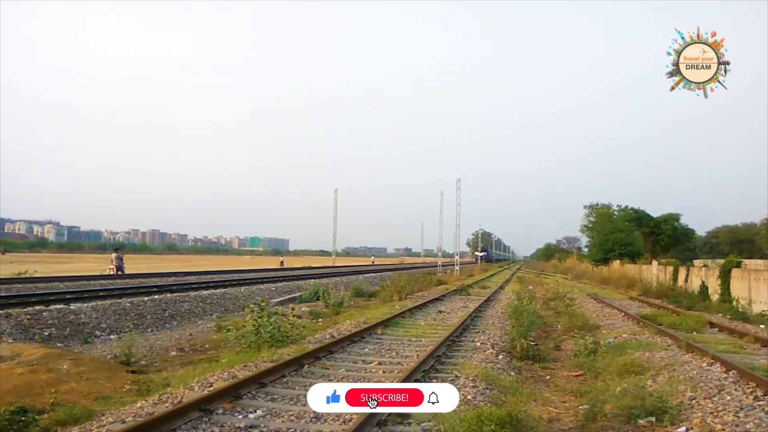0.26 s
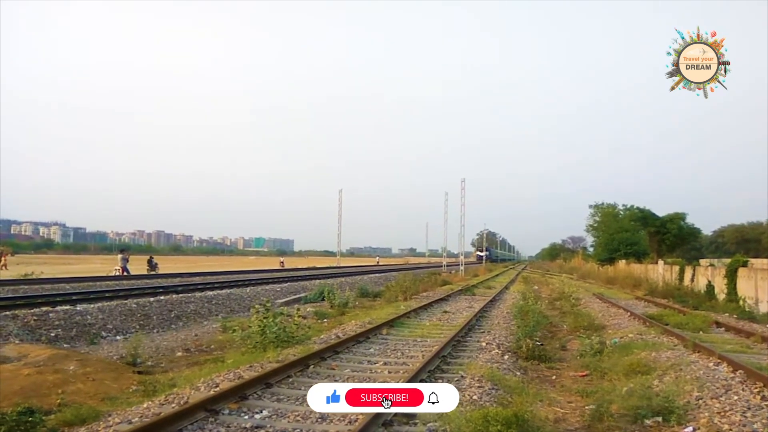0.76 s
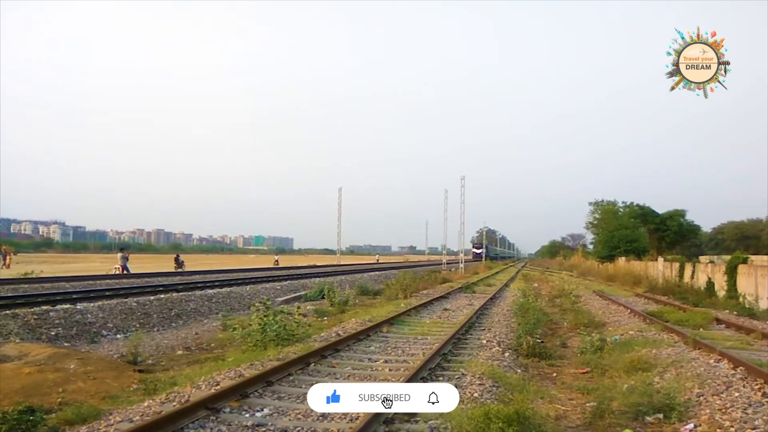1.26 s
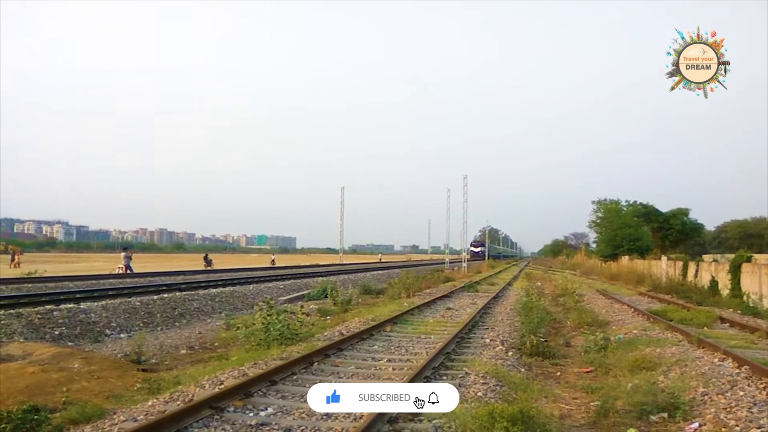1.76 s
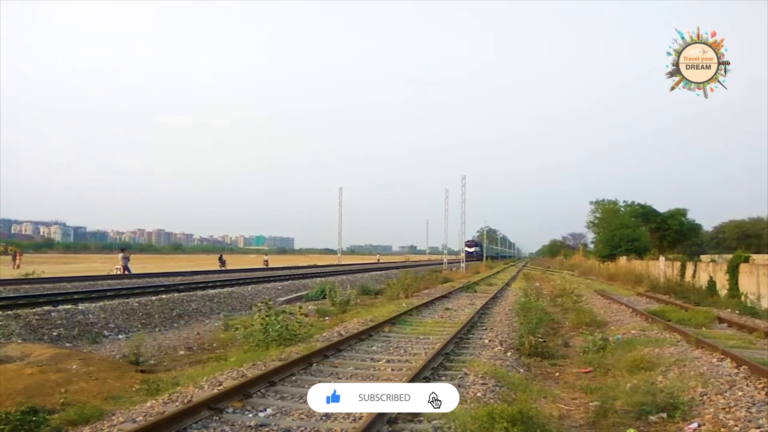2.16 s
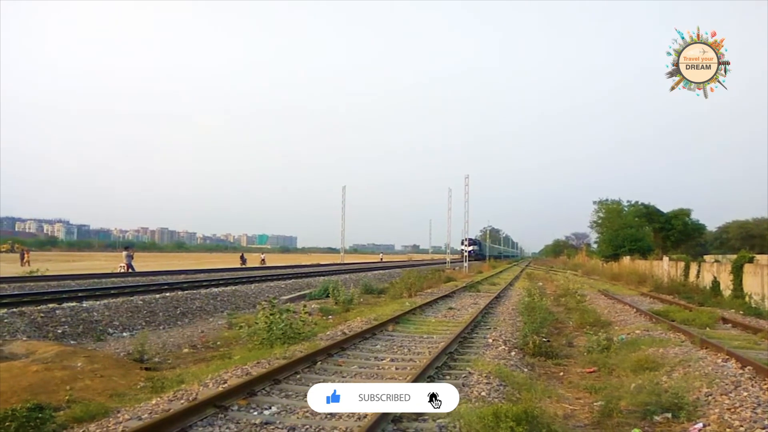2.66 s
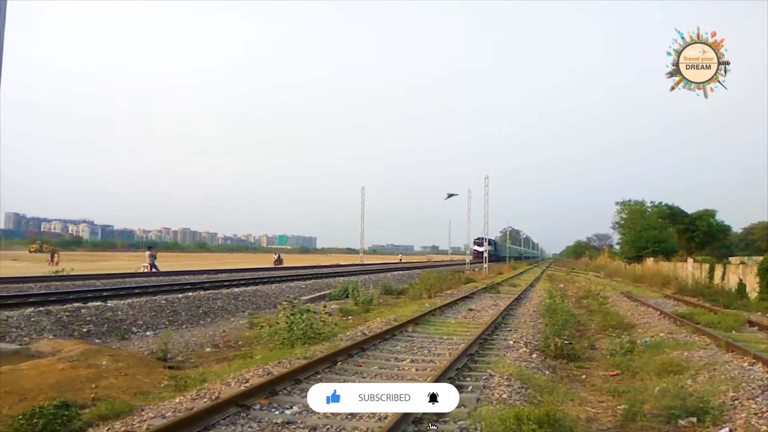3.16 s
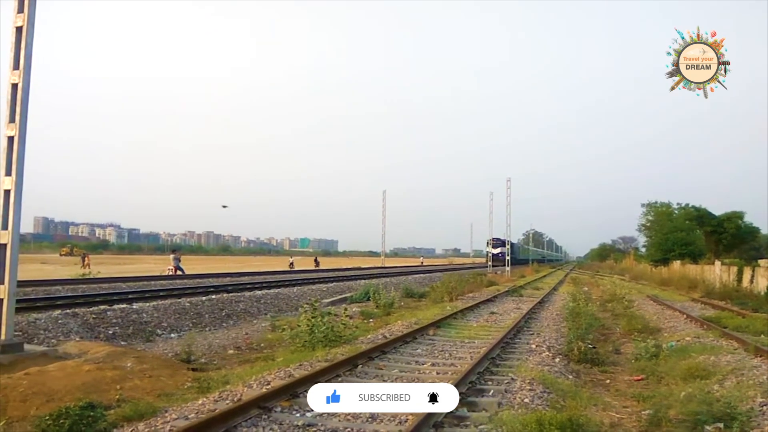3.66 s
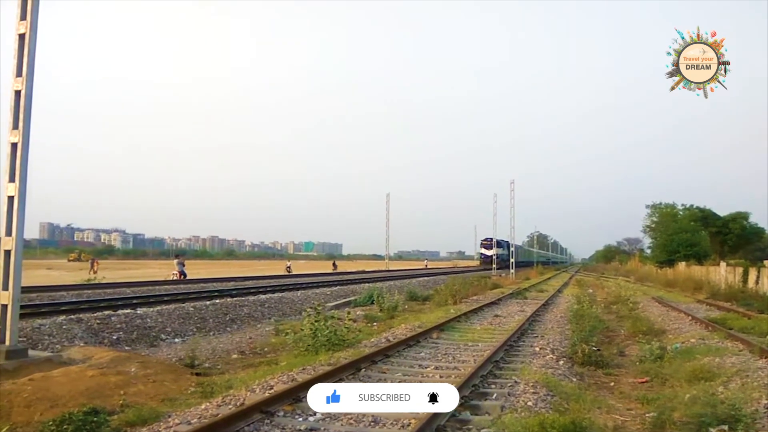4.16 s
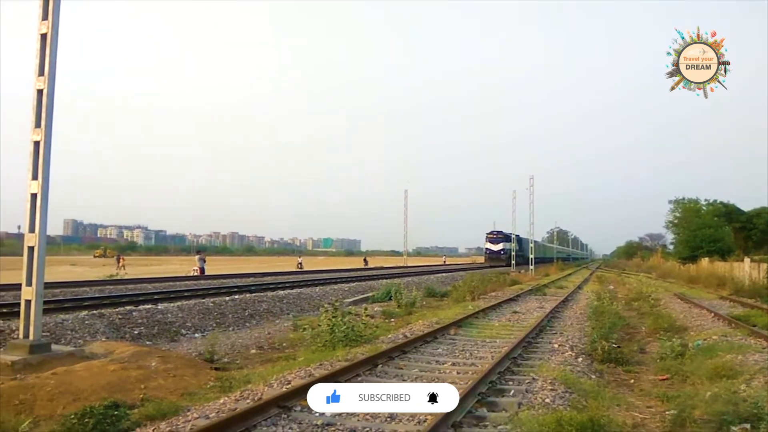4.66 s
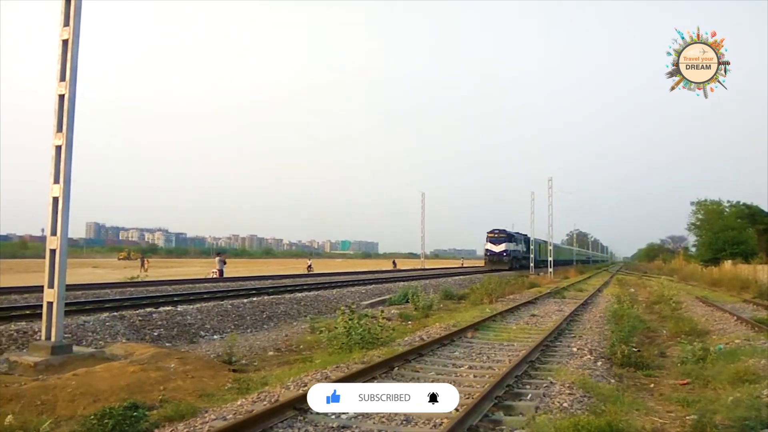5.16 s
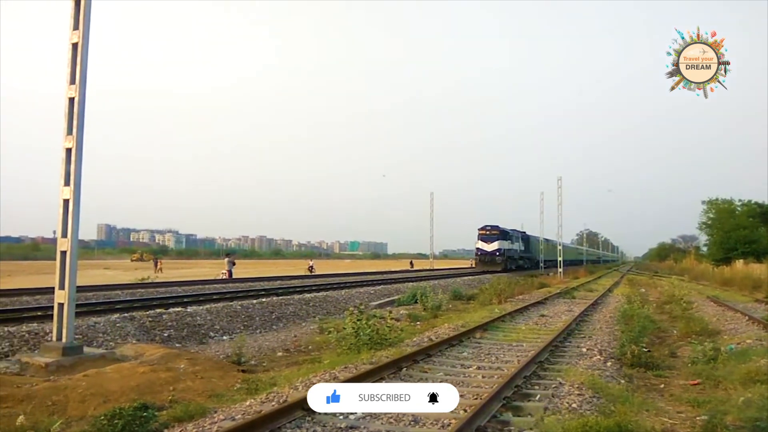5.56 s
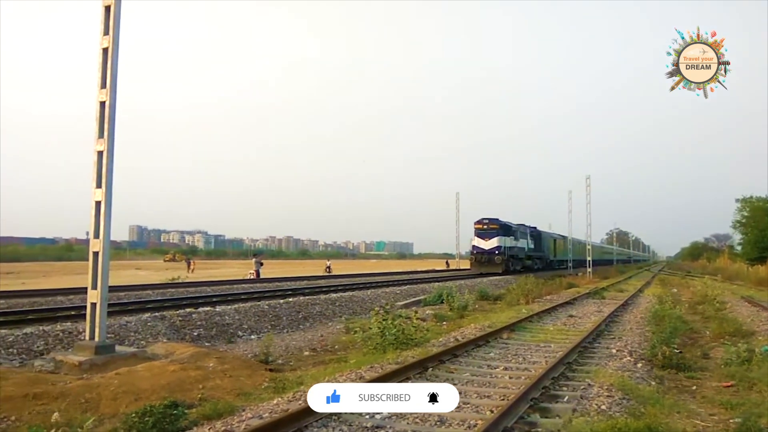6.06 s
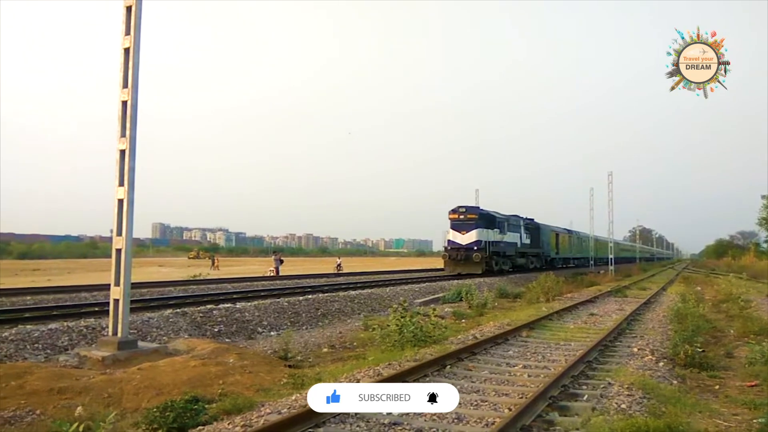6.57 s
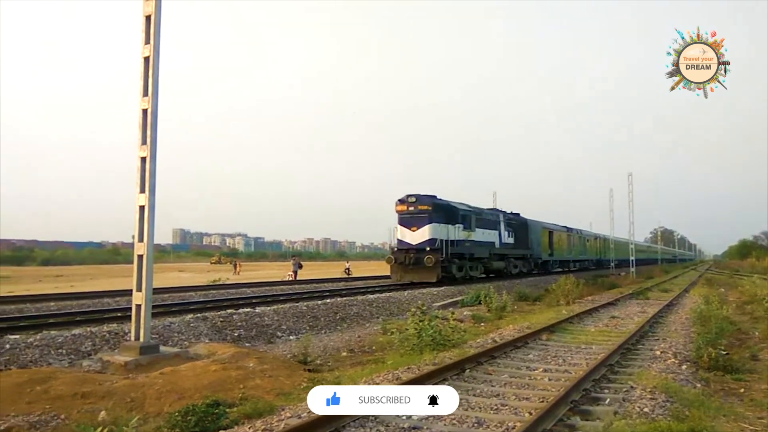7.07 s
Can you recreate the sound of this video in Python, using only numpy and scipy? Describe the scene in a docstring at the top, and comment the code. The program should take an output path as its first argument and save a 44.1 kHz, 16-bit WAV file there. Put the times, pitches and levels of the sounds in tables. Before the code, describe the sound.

Open fields by a railway, heard through a phone in stereo. From 0 to 4.5 s it is quiet: soft airy field noise, low rumble and a wavering diesel drone around 80 Hz that dips and surges. Small birds give short raspy falling chirps, clearest around 0.2-1.3 s, with more near 1.8-3.5 s. A faint, distant steady tone near 355 Hz swells from about 1.1 to 2.4 s. At 4.55 s a loud air horn bursts in near 456 Hz, joined at 4.77 s by a lower one near 322 Hz: a harsh, brassy tritone with shimmer, rushing air and blurred field echoes. Its colour shifts as the train nears. Both stop sharply around 6.6 s, leaving a short echo. Rumble and engine swell; from 6.9 s quick metallic rail knocks and rattling build, and from 7.1 s a bright hiss of escaping air rises with the wheel roar until the end at 7.3 s.

```python
"""Open fields beside a railway track: a diesel locomotive approaches a phone.
Two air horns a tritone apart, summed from overtones, sound over a wavering exhaust drone;
escaping air, rumble, wheel roar and hiss are shaped noise, and wheel blows ring rail modes.
Small birds are chopped falling chirps; a faint far tone swells before the horns."""
import sys
import numpy as np
from scipy import signal
from scipy.fft import rfft, irfft, next_fast_len
from scipy.io import wavfile
from scipy.ndimage import uniform_filter1d

SR = 44100
rng = np.random.default_rng(int(sys.argv[2]) if len(sys.argv) > 2 else 0)


def decibels_to_gain(level_db):
    """Convert a level in decibels to a linear amplitude gain (20 dB per decade)."""
    exponent = np.asarray(level_db, float) / 20
    return 10 ** exponent


def transcribe(u):
    """Save the signal u as a 16-bit wav file named by the first command-line argument.

    u: samples, shape (n,) or (channels, n), limited to [-1, 1]; the rate is SR.
    q: integer samples, one column per channel.
    """
    v = np.clip(np.atleast_2d(u).T, -1, 1)
    q = np.round(v * 32767).astype(np.int16)
    wavfile.write(sys.argv[1], SR, q)


N = 321930
t = np.arange(N) / SR

# horn valves: full_s, shut_s, pitch_hz, sag_hz_per_s, rise_db_per_s, fall_db_per_s2
# (rise and fall grow with overtone number)
HIGH_HORN_VALVE = (4.553, 6.595, 455.9, 1.0, 1400, 5000)
LOW_HORN_VALVE = (4.77, 6.6, 321.9, .7, 300, 2880)
# horn overtones: multiple, far_rms_db, change_when_near_db
HIGH_HORN_TONES = [(1, -23, -7), (2, -20.5, -6.5), (3, -32.5, 5.5), (4, -39.5, -4), (5, -36.5, 4.5),
                   (6, -35.5, 0), (7, -44.5, -2.5), (8, -39, 2), (9, -47, 2), (10, -42, -5), (11, -52, 1.5),
                   (12, -48, -3.5), (13, -52, -6.5), (14, -57.5, -7), (15, -67.5, -4.5), (16, -80, -5.5),
                   (19, -91.5, 4.5), (20, -87.5, -5.5)]
LOW_HORN_TONES = [(1, -22.5, 6.5), (2, -26.5, -4.5), (3, -26.5, -4.5), (4, -40, 5), (5, -46.5, 2),
                  (6, -46.5, 2), (7, -52, 0), (8, -49.5, 0), (9, -52, -3.5), (10, -54, 1), (11, -64.5, -3),
                  (12, -60, 1.5)]
# ground bounce recolours the horns as the train closes in: time_s, share_of_change
NEARING_SHARE = [(4.5, -.1), (5.0, 0), (5.5, 0), (5.9, 0.42), (6.1, 0.39), (6.3, 1), (6.7, 1.01)]
# air through the horns, spectrum shape: freq_hz, relative_db_per_hz
HORN_AIR_COLOUR = [(200, -12.5), (400, -7.5), (800, -3.5), (1150, -6), (1400, -6), (2100, -10),
                   (2500, -6.5), (3300, -23), (3900, -6), (4300, -18.5), (5300, -15.5), (5700, -35),
                   (6100, -21.5), (6800, -38), (7500, -65)]
# compressed air let off as the engine draws level, spectrum shape: freq_hz, relative_db_per_hz
BLAST_COLOUR = [(880, -33), (1500, 1.5), (1830, -17), (2340, 8), (3160, -27), (3710, 1), (4090, -9),
                (5400, 3), (7040, -7), (9150, -31.5), (15500, -120)]
# exhaust drone: time_s, level_db (before a common trim)
ENGINE_LEVEL = [(0.0, -51), (0.04, -44), (0.2, -63), (0.41, -44.5), (1.38, -51), (1.44, -34), (1.57, -46),
                (1.85, -39), (2.05, -56), (2.09, -38), (2.66, -38), (3.43, -49.5), (3.5, -38.5),
                (4.55, -35.5), (4.88, -57), (5.29, -36.5), (5.69, -51.5), (5.77, -30), (5.9, -54.5),
                (6.04, -35), (6.53, -32), (6.67, -39.5), (6.95, -27.5), (7.3, -40.5)]
# rail-joint knocks: start_s, peak_db
RAIL_KNOCKS = [(6.927, -29), (6.996, -20), (7.083, -25.5), (7.124, -23), (7.144, -26), (7.178, -31),
               (7.223, -27), (7.259, -28)]
# rail ringing: freq_hz, relative_db, t60_s
RAIL_RINGS = [(200, -1, 0.015), (792, 7.5, 0.022), (851, 8, 0.017), (965, -1.5, 0.039)]
# train drawing near: time_s, low_roar_db, rumble_db (rumble before trim)
APPROACH_LEVELS = [(0, -46.5, -49), (.5, -49, -50), (1.3, -43.5, -50), (2.0, -46, -48.5), (2.4, -46, -45),
                   (3.3, -47, -45.5), (4.1, -43, -43), (4.7, -43.5, -47), (5.7, -42, -46),
                   (6.4, -34.5, -39), (6.7, -40, -45), (6.95, -36.5, -37), (7.3, -33, -37)]
# middle noise before and after the horns: time_s, level_db (before trim)
FIELD_LEVEL = [(0, -62), (.55, -64), (.76, -60), (1.02, -65.5), (1.17, -60.5), (1.5, -62), (1.98, -65),
               (2.15, -60), (2.38, -65.5), (2.76, -61), (3.2, -61), (3.55, -63.5), (4.1, -59.5), (4.5, -57),
               (6.72, -55.5), (6.9, -55), (7.06, -52.5), (7.12, -46), (7.3, -45.5)]
# treble hiss swells: centre_s, length_s, rise_db
TREBLE_SWELLS = [(.5, .3, 5), (1.166, 0.14, 3.5), (1.42, 0.1, 9), (1.853, 0.11, 6), (2.184, 0.12, 1.5),
                 (2.92, 0.2, 4), (3.316, 0.52, 6.5), (4.234, 0.24, 8.5), (7.28, 0.28, 15)]
# noise spectrum shape: freq_hz, relative_db_per_hz
NOISE_COLOUR = [(25, -41), (38, -24), (55, -4), (75, -7), (124, -20), (300, -25), (420, -23), (560, -30.5),
                (950, -25.5), (1170, -35.5), (1700, -44.5), (2660, -40), (3140, -52), (3710, -47.5),
                (4330, -49), (5310, -47.5), (6300, -55.5), (7040, -68), (9150, -100)]
# borders of the five noise layers: freq_hz
LAYER_BORDERS_HZ = [90, 330, 1300, 4400]
# bird notes: start_s, length_s, first_hz, last_hz, level_db (before chip shaping)
BIRD_TRILLS = [(.245, .054, 4570, 4360, -52), (0.437, .13, 4420, 4000, -44.5),
               (0.675, 0.11, 4470, 4130, -42.5), (1.201, 0.015, 4600, 4570, -51.5),
               (1.811, 0.023, 5140, 4980, -47.5), (1.879, 0.023, 5300, 5200, -50.5)]
BIRD_CHIRPS = [(0.407, .035, 3280, 3570, -53.5), (.65, .03, 4720, 5020, -50),
               (1.081, .07, 4910, 5100, -52.5), (1.09, .06, 4450, 4400, -50),
               (1.218, 0.032, 3600, 3360, -47.5), (1.252, .08, 4820, 4700, -57),
               (1.302, .073, 2680, 2490, -48.5), (2.166, .16, 3710, 2360, -47.5),
               (2.63, 0.064, 5150, 4960, -55.5), (2.677, 0.059, 3860, 3700, -43),
               (2.745, 0.049, 3580, 3300, -48), (3.049, 0.056, 5060, 4570, -47),
               (3.068, 0.087, 4120, 3790, -48), (3.474, 0.086, 3940, 4000, -54)]
# far steady tone: start_s, length_s, start_level_db
FAR_TONE_SWELLS = [(.2, 0.12, -57), (1.147, 1.26, -46.5), (3.14, 0.13, -55), (4.38, .14, -54.5)]
# phone ports: freq_hz, left_minus_right_db, left_lead_rad, noise_likeness
PHONE_PORTS = [(60, -0.5, 0, 0.99), (320, 0, 0.13, 0.94), (455, -0.5, 0, 0.7), (640, -2, -0.03, 0.5),
               (880, 0, -0.17, 0.2), (1427, -7, 1.82, .5), (1683, -0.5, 5.5, 1), (1910, 1.5, 4, 1),
               (2130, 9, 6.5, 0.2), (2530, -4, 6.5, 0.7), (3160, 7, 10.5, 0.6), (3700, 7.5, 7.5, 0.8),
               (4095, 10.5, 6.5, 1), (4260, -3, 7, 1), (4630, 16, 8.5, 0.7), (5270, 6, 8, 0.5),
               (7240, 5, 8.5, 1)]

FADE_DB, FADE_FROM_HZ, FADE_FULL_HZ, FADE_PER_S = 2.5, 850, 1400, 17  # random overtone fades
BUILD_DB, BUILD_S = 7.5, 0.045  # brassy top builds after the valve opens
HORN_AIR_START_DB, HORN_AIR_DB_PER_S = -45, 4.5
BLAST_S, BLAST_DB, BLAST_RISE_DB_PER_S, BLAST_SWELL_DB_PER_S = 7.11, -47, 305, 28.5
FIRING_HZ = 80.6
# wheel roar and hiss when FIELD_LEVEL reads -60 dB; roar follows it by a share
WHEEL_DB, WHEEL_SHARE, HISS_DB = -50, 0.71, -68.5
CHIPS_PER_S, TRILL_SWEEP_HZ, CHIRP_SWEEP_HZ = 70, 950, 260
FAR_HZ, FAR_FAINT_DB, FAR_SAG_DB_PER_S = 354.7, -61.5, 4.5


def curves(rows):
    """Columns of a table read at every sample."""
    s, *columns = np.transpose(rows)
    return [np.interp(t, s, c) for c in columns]


def walk(rate_hz):
    """Random levels held 1 / rate_hz s and slewed twice; spread near 1."""
    k = int(SR / rate_hz)
    held = np.repeat(rng.standard_normal(N // k + 1), k)
    return 1.48 * uniform_filter1d(uniform_filter1d(held, k), k)[:N]


def drift(rate_hz):
    """A walk in both size and phase."""
    return walk(rate_hz) + 1j * walk(rate_hz)


def valve(full_s, shut_s, rise_db_per_s, fall_db_per_s):
    """Level in dB: a steady climb to full, a hold, a steady fall."""
    opening_db = np.minimum(0, rise_db_per_s * (t - full_s))
    return opening_db + np.minimum(0, fall_db_per_s * (shut_s - t))


def port(hz):
    """Left and right response to trackside sound, scaled to hold the level of their mean; likeness."""
    f, *columns = np.transpose(PHONE_PORTS)
    pan_db, lead_rad, alike = (np.interp(hz, f, c) for c in columns)
    left = decibels_to_gain(pan_db / 2) * np.exp(.5j * lead_rad)
    pair = np.array([left, 1 / left])
    return pair / np.maximum(abs(pair.mean(axis=0)), .5), np.clip(alike, 0, 1)


def spread(colour):
    """Spectrum of coloured noise at both ports, partly from the track and partly from all round."""
    size = 2 * next_fast_len(N // 2 + 1)
    hz = np.arange(size // 2 + 1) * SR / size + 1e-3
    ears, alike = port(hz)
    track, left, right = (rfft(rng.standard_normal(size)) for _ in range(3))
    f, db = np.transpose(colour)
    gain = decibels_to_gain(np.interp(np.log(hz), np.log(f), db))
    around = np.array([left, right])
    return hz, gain * ears * (np.sqrt(alike) * track + np.sqrt(1 - alike) * around)


def horn(blast, tones, shimmer, echo_db, echo_flat, echo_hz):
    """A beating reed gives clean overtones; moving air makes them shimmer, field echoes smear below each."""
    full_s, shut_s, pitch_hz, sag, rise, fall = blast
    # starts sharp while the air pressure settles, then sags slowly
    sharp = .018 * np.exp(-np.maximum(t - full_s + .015, 0) / .035)
    hz = (pitch_hz - sag * (t - full_s)) * (1 + sharp)
    cycle = 2 * np.pi * np.cumsum(hz) / SR
    opening_db = np.minimum(0, rise * (t - full_s))
    closing_db = -fall * np.maximum(0, t - shut_s) ** 2
    near = curves(NEARING_SHARE)[0]
    opposed = np.array([[1], [-1]])
    out = 0
    for k, far_db, change_db in tones:
        tone_hz = k * pitch_hz
        fade_db = FADE_DB * np.clip((tone_hz - FADE_FROM_HZ) / (FADE_FULL_HZ - FADE_FROM_HZ), .1, 1)
        # upper overtones need more pressure: come later, leave first
        db = far_db + change_db * near + k ** .4 * opening_db + k ** 1.76 * closing_db
        db = db + fade_db * (walk(FADE_PER_S) + 0.87 * walk(3 * FADE_PER_S))
        brassy = np.clip((tone_hz - FADE_FULL_HZ) / FADE_FULL_HZ, 0, 1)
        db = db - BUILD_DB * brassy * np.exp(-abs(t - full_s) / BUILD_S)
        turn = np.exp(1j * (k * cycle + rng.uniform(0, 2 * np.pi)))
        ears, alike = port(tone_hz)
        apart = np.sqrt(1 - alike) * opposed
        # short waves scatter more, and differently at each port
        flutter = 1 + shimmer * np.sqrt(k) * (drift(25) + 0.85 * apart * drift(9))
        flutter = flutter * decibels_to_gain(0.75 * (fade_db - 0.15 * FADE_DB) * walk(FADE_PER_S) * opposed)
        # echoes from the side: less Doppler lift, pitch spread; nearing cuts do not apply
        lagging = uniform_filter1d(decibels_to_gain(db - min(change_db, 0) * near), size=2400, origin=1150)
        scatter = drift(k * echo_hz) + apart * drift(k * echo_hz)
        scatter = scatter + 0.32 * (drift(220) + apart * drift(220))
        flatten = np.exp(-1j * k * echo_flat * cycle)
        echo = decibels_to_gain(echo_db) * min(k / 2, 1) * lagging * scatter * flatten
        out = out + np.sqrt(2) * ((decibels_to_gain(db) * flutter + echo) * ears[:, None] * turn).imag
    return out


def wall_echo(high):
    """Far walls return the high horn's upper overtones a quarter second late, blurred."""
    band = signal.butter(2, [1500, 3200], "band", fs=SR, output="sos")
    return decibels_to_gain(-31) * walk(60) * np.roll(signal.sosfilt(band, high), 11000, axis=1)


def rush(colour, db):
    """Escaping air: coloured noise that sputters slightly."""
    x = irfft(spread(colour)[1])[:, :N]
    return decibels_to_gain(db + .8 * walk(40)) * x / x.mean(axis=0).std()


def escaping_air():
    """Air rushes through the horns while they sound; compressed air is let off late."""
    full_s, shut_s = HIGH_HORN_VALVE[:2]
    horn_db = HORN_AIR_START_DB + HORN_AIR_DB_PER_S * (t - full_s) + valve(full_s, shut_s, 380, 340)
    blast_db = BLAST_DB + BLAST_SWELL_DB_PER_S * (t - BLAST_S)
    blast_db = blast_db + valve(BLAST_S, N / SR, BLAST_RISE_DB_PER_S, 0)
    return rush(HORN_AIR_COLOUR, horn_db) + rush(BLAST_COLOUR, blast_db)


def engine():
    """Firings blend into a wavering drone with a weak second overtone; it drops out now and then."""
    cycle = 2 * np.pi * np.cumsum(FIRING_HZ * (1 + .015 * walk(8))) / SR
    waver = abs(1 + 0.37 * drift(16))
    tone = np.sin(cycle) + decibels_to_gain(-15.5) * np.sin(2 * cycle)
    return np.sqrt(2) * decibels_to_gain(curves(ENGINE_LEVEL)[0] - 2.5) * waver * tone


def knocks():
    """Wheel blows on the joints ring the rail; a soft random rattle swells as the wheels come near."""
    blows, u = np.zeros(N), np.arange(4000) / SR
    ring = sum(decibels_to_gain(db) * np.sin(2 * np.pi * hz * u) * 1000. ** (-u / t60_s)
               for hz, db, t60_s in RAIL_RINGS)
    ring = -ring * np.minimum(u / .003, 1)
    when, size, side = rng.uniform(size=(130, 3)).T
    rattle = decibels_to_gain(-44.5 + 10.7 * when + 5.1 * size) * np.sign(side - .5)
    blows[(SR * (6.8 + .49 * when)).astype(int)] = rattle
    for s, db in RAIL_KNOCKS:
        blows[int(s * SR)] += decibels_to_gain(db)
    return signal.fftconvolve(blows, ring / abs(ring).max())[:N]


def noise_levels():
    """dB of rumble, low roar, wheel roar, middle noise and hiss."""
    low, rumble = curves(APPROACH_LEVELS)
    middle = curves(FIELD_LEVEL)[0]
    above = middle + 60
    swells = sum(db * np.exp(-((t - s) / (length / 2)) ** 2) for s, length, db in TREBLE_SWELLS)
    return [rumble - 1.5 + 2 * walk(5), low, WHEEL_DB + WHEEL_SHARE * above, middle + 3.2,
            HISS_DB + above + swells]


def roar(layers_db):
    """Third-octave noise bands in five layers, each band flickering alone."""
    hz, noise = spread(NOISE_COLOUR)
    layers = np.zeros((5, 2, N))
    for centre_hz in 30 * 2 ** (np.arange(26) / 3):
        window = np.cos(np.pi / 2 * np.clip(3 * np.log2(hz / centre_hz), -1, 1)) ** 2
        flicker = decibels_to_gain(1.72 * walk(11) + 1.2 * walk(22))
        layer = np.searchsorted(LAYER_BORDERS_HZ, centre_hz)
        layers[layer] += flicker * irfft(noise * window)[:, :N]
    return sum(decibels_to_gain(db) * x / x.mean(axis=0).std() for db, x in zip(layers_db, layers))


def birds():
    """Raspy notes chopped into uneven falling chips, loudest early and blurred by distance."""
    out = np.zeros((2, N))
    rasp, hurry, waver = 1 + .7 * drift(450), decibels_to_gain(2.5 * walk(60)), walk(90)
    notes = [(*row, TRILL_SWEEP_HZ) for row in BIRD_TRILLS]
    notes += [(*row, CHIRP_SWEEP_HZ) for row in BIRD_CHIRPS]
    for s, length, first, last, db, sweep_hz in notes:
        u = np.arange(int(length * SR)) / SR
        at = slice(int(s * SR), int(s * SR) + len(u))
        beat = np.cumsum(CHIPS_PER_S * hurry[at]) / SR % 1
        hz = first + (last - first) * u / length + sweep_hz * (.3 - beat) + 120 * waver[at]
        chips = .1 + np.minimum(beat / .08, 1) * np.exp(-beat / .35)
        swell = np.sin(np.pi * u / length) ** .3 * np.exp(-.8 * u / length)
        note = np.exp(2j * np.pi * np.cumsum(hz) / SR) * swell * chips * rasp[at]
        ears = port((first + last) / 2)[0]
        out[:, at] += decibels_to_gain(db) * (ears[:, None] * note).imag
    tail = rng.standard_normal((2, 4000)) * np.exp(-np.arange(4000) / 1300.)
    return out + decibels_to_gain(-31) * signal.fftconvolve(out, tail, axes=1)[:, :N]


def far_tone():
    """A faint wavering tone of fixed pitch until the high horn; its swells sag while they last."""
    gain = decibels_to_gain(FAR_FAINT_DB)
    for s, length, db in FAR_TONE_SWELLS:
        gain = gain + decibels_to_gain(db - FAR_SAG_DB_PER_S * (t - s) + valve(s, s + length, 87, 251))
    gain = gain * (t < HIGH_HORN_VALVE[0]) * decibels_to_gain(1.7 * walk(9))
    return np.sqrt(2) * gain * np.sin(2 * np.pi * FAR_HZ * t)


def scene():
    """Horns, wall echo, air, engine, knocks, noise layers, birds and the far tone."""
    high = horn(HIGH_HORN_VALVE, HIGH_HORN_TONES,
                shimmer=0.03, echo_db=-15.5, echo_flat=0.015, echo_hz=21.81)
    low = horn(LOW_HORN_VALVE, LOW_HORN_TONES,
               shimmer=0.04, echo_db=-22.0, echo_flat=0.016, echo_hz=16.)
    horns = high + wall_echo(high) + low
    train = escaping_air() + engine() + knocks()
    return horns + train + roar(noise_levels()) + birds() + far_tone()


def band_limit(x):
    """A steep low-pass at the top of the band."""
    return signal.sosfilt(signal.butter(12, 10000, fs=SR, output="sos"), x)


def record(dry):
    """The microphone bends loud peaks a little, mixing the two horns into faint sum tones."""
    squared = dry ** 2
    bent = 1.107 * np.tanh(dry / 0.95) + 0.075 * (squared - uniform_filter1d(squared, size=2000))
    return band_limit(bent)


dry = scene()
out = record(dry)
transcribe(out)
```